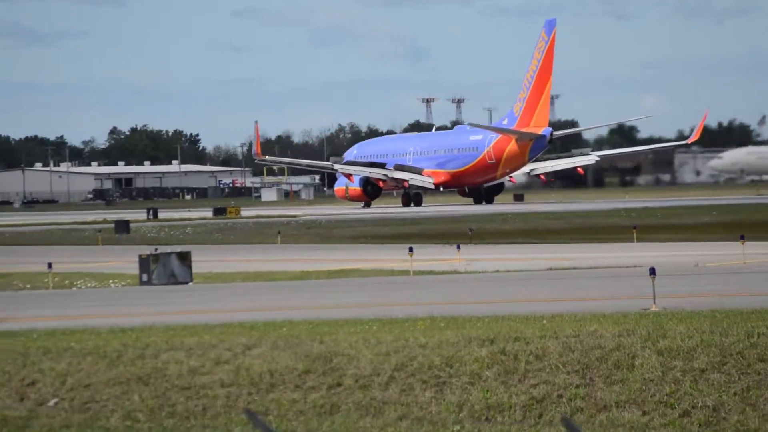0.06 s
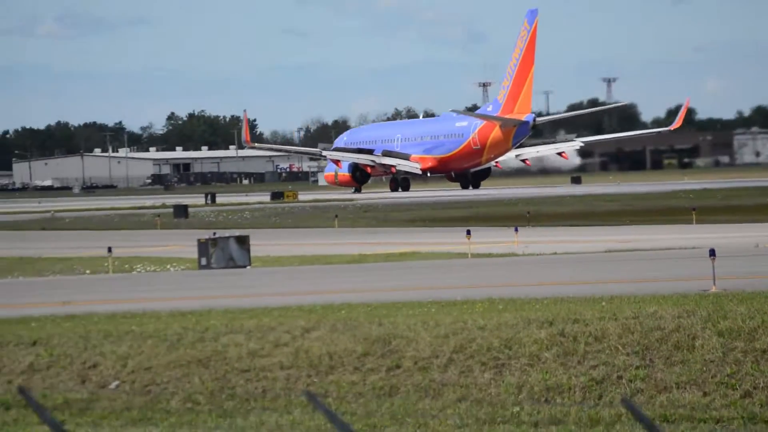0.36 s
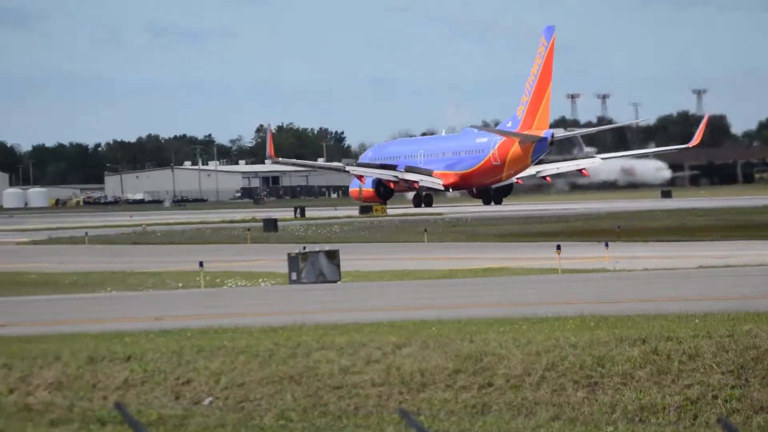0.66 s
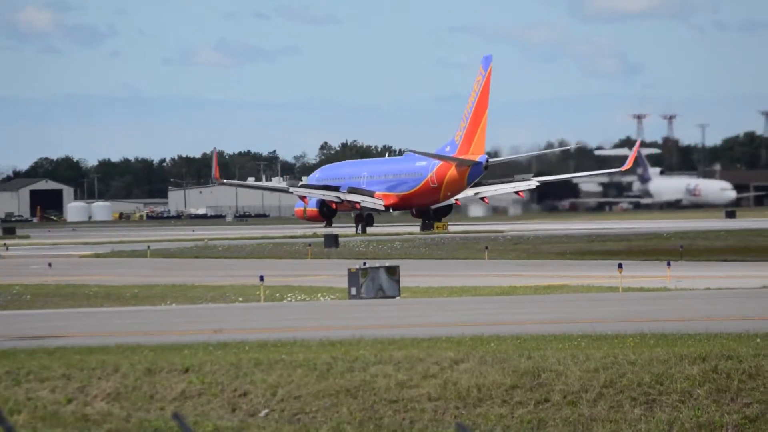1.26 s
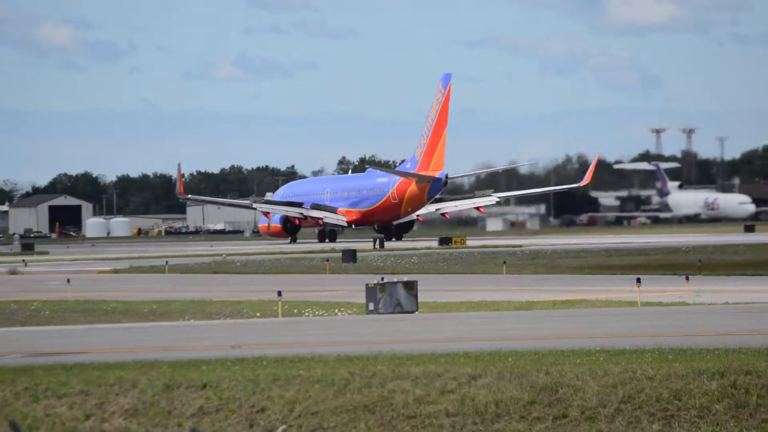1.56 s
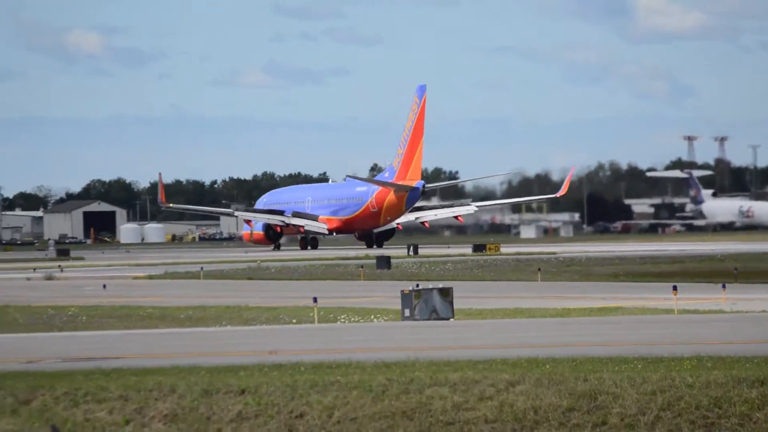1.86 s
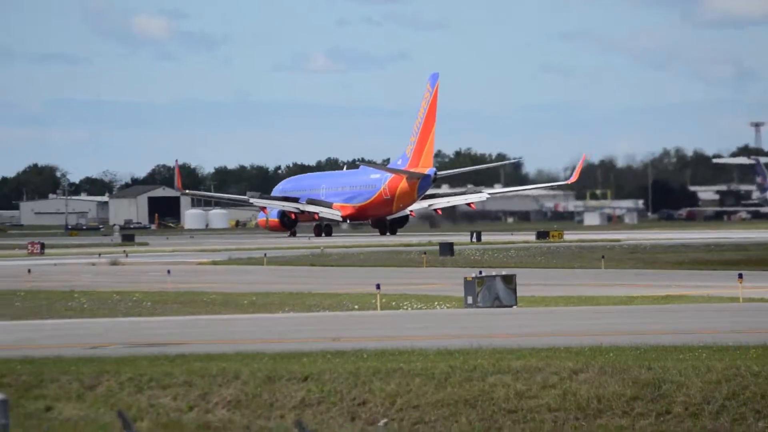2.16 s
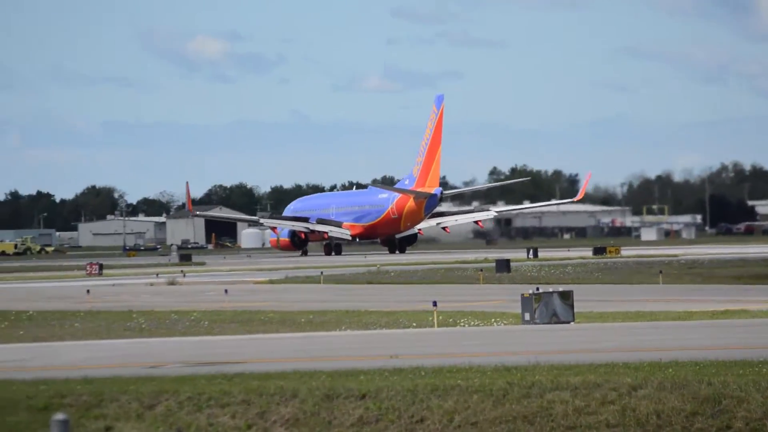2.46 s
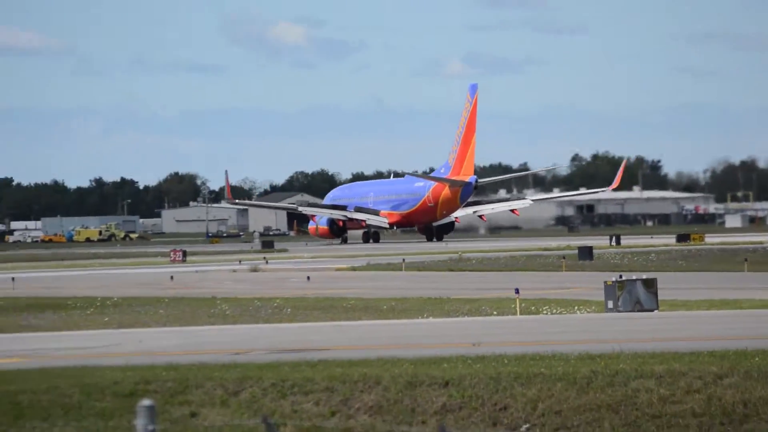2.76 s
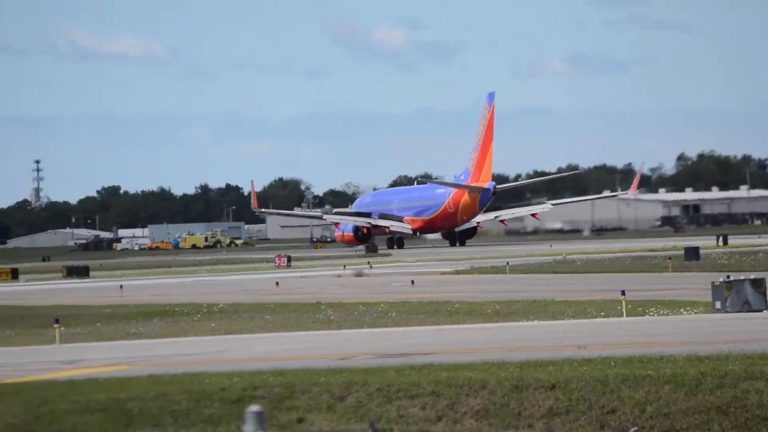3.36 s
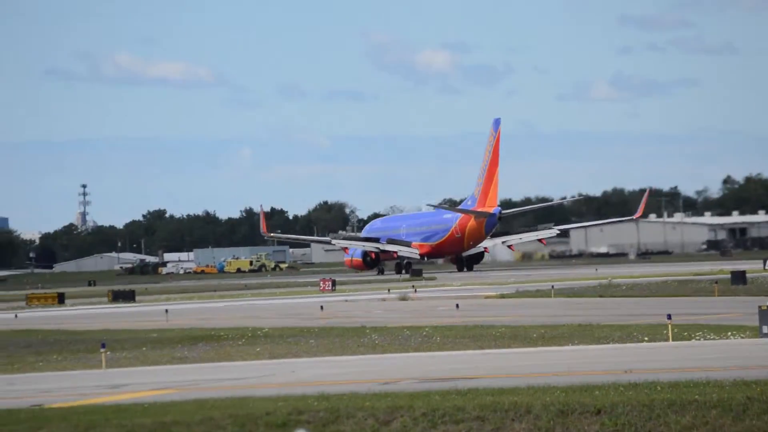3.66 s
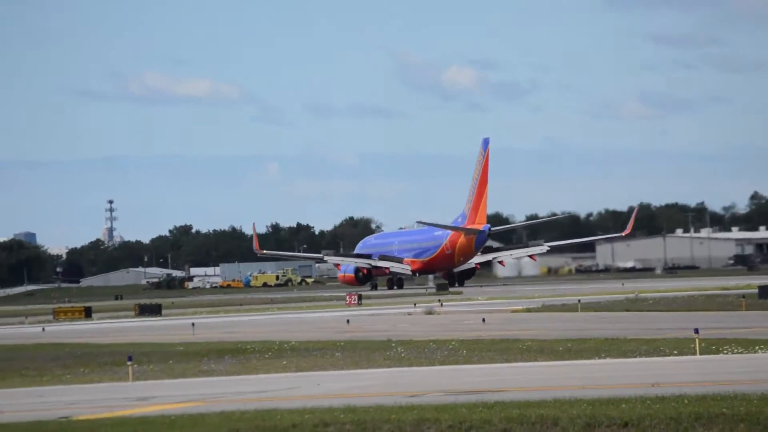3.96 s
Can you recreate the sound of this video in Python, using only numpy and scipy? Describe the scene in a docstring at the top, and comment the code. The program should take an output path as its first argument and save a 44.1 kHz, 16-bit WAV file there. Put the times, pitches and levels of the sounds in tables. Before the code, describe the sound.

A distant jet airliner roars steadily as it rolls away along a runway.

```python
"""Airfield, far from the runway: a jet airliner rolls away.
Exhaust roar, plume rumble and a fading turbine whine arrive twice, direct and off the ground.
The lag shrinks as the jet recedes, so the hollow comb colour slides up; moving air adds flutter.
At the microphone: light breeze, faint hiss, two tiny ticks (the first with a weak afterclick)."""
import sys
import numpy as np
from scipy import signal
from scipy.fft import rfft, irfft
from scipy.io import wavfile

SR = 44100
rng = np.random.default_rng(int(sys.argv[2]) if len(sys.argv) > 2 else 0)


def master_out(mix):
    """Clip the mix to full scale and print it as 16-bit PCM to the path in sys.argv[1]."""
    frames = np.transpose(np.atleast_2d(mix))
    ceiling = np.clip(frames, -1, 1)
    pcm = np.round(ceiling * 32767).astype(np.int16)
    wavfile.write(sys.argv[1], SR, pcm)


N = 176400

# Source spectra: f/Hz, relative density/dB
ROAR_SPECTRUM = [(200, -42.5), (500, -18.5), (800, -6.5), (1050, -2), (1330, .5), (1650, -3), (1950, -4.5),
                 (2400, -13), (3100, -20), (4000, -26.5), (5000, -37.5), (6000, -48.5), (7000, -63.5),
                 (10000, -89)]  # exhaust roar
BODY_SPECTRUM = [(100, -26.5), (260, -7), (390, -8), (560, 1.5), (720, -0.5), (900, -11.5), (1400, -26),
                 (6000, -89.5)]  # its lower, throaty part
RUMBLE_SPECTRUM = [(15, -40.5), (35, -21.5), (60, -5.5), (85, 2), (125, 2), (165, 2), (220, -4.5),
                   (380, -13), (900, -59), (4000, -100)]  # jet plume
BREEZE_SPECTRUM = [(8, -19.5), (25, -8), (42, 4.5), (80, -5.5), (200, -40.5), (800, -89.5)]  # wind on the microphone
HISS_SPECTRUM = [(1000, 0.5), (6500, 0), (9700, 1.5), (12000, -7), (15500, -9.5)]
# Jet envelopes, ahead of the airfield path: t/s, level/dB
ROAR_ENVELOPE = [(0, -18), (.75, -17), (1.1, -18.5), (1.5, -17), (1.85, -18), (2.19, -18.5), (2.23, -20.3),
                 (2.4, -19), (2.72, -18.2), (2.88, -19.5), (3.0, -17), (3.1, -18.8), (3.45, -18),
                 (4, -18.5)]
BODY_ENVELOPE = [(0, -21.5), (.4, -24), (.9, -24.5), (1.3, -25.5), (1.8, -26), (2.05, -22.5), (2.8, -24.5),
                 (2.98, -21.5), (3.2, -25), (4, -24.5)]
RUMBLE_ENVELOPE = [(0, -25), (.7, -25.5), (1.08, -25.5), (1.25, -24), (1.55, -27), (2.099, -27.5),
                   (2.6, -29), (4, -28)]
RING_ENVELOPE = [(0, -37.5), (1.68, -33), (1.85, -21), (1.93, -25.5), (2.15, -23), (2.25, -33),
                 (2.7, -26.5), (4, -34)]  # narrow band ringing in the roar
# Ground reflection behind the direct sound: t/s, lag/ms
BOUNCE_LAG = [(0, 1.82), (.6, 1.727), (1.4, 1.676), (2.1, 1.62), (2.7, 1.62), (4, 1.617)]
# Ground reflection at mid-scene, ahead of a 0 dB cap: f/Hz, gain/dB
BOUNCE_GAIN = [(100, 11), (300, -4), (900, -5), (1500, -11), (2200, -13.5), (2700, -14.5), (3200, -18),
               (4000, -25.5), (6000, -35)]
# Hiss envelope: t/s, level/dB
HISS_ENVELOPE = [(0, -70.5), (2, -69.5), (3, -65), (4, -60.5)]
# Ticks: t/s, peak level/dB
TICK_EVENTS = [(2.258, -21), (2.269, -39), (2.673, -26)]
# Tick resonances: f/Hz, relative level/dB, T60/s
TICK_RESONANCES = [(6200, 8, 0.0017), (7700, 4, 0.0016), (9700, -8, .003), (11400, -10, .003),
                   (13300, -11, .003)]

RING_HZ, RING_WIDTH_HZ = 1291, 150
WHINE_HZ, WHINE_WIDTH_HZ, WHINE_DB = 2933, 120, -43.5
WHINE_HOLD_S, WHINE_FADE_DB_PER_S = 1.0, 10.5
BOUNCE_FADE_DB_PER_S_KHZ = 0.43  # treble drops as the path flattens
AIR_DB_PER_S, AIR_REF_HZ = 0.72, 5000
FLUTTER_DB, FLUTTER_S, FLUTTER_WIDTH_HZ = 0.59, .1, 220
BREEZE_DB, BREEZE_RISE_DB_PER_S, GUST_DB, GUST_S = -46.5, 2.5, 1.5, .08
TICK_BAND_HZ, TICK_TAIL_DB, TICK_TAIL_T60_S = (5400, 14000), -28, 0.024
OVERLOAD_KNEE, OVERLOAD_LOSS, CUTOFF_HZ = 0.41, 0.15, 15800


def exhaust():
    """Turbulent jet: noise in three registers plus a ringing mid band."""
    roar = noise(ROAR_SPECTRUM) * envelope(ROAR_ENVELOPE)
    body = noise(BODY_SPECTRUM) * envelope(BODY_ENVELOPE)
    rumble = noise(RUMBLE_SPECTRUM) * envelope(RUMBLE_ENVELOPE)
    ring = band(RING_HZ, RING_WIDTH_HZ) * envelope(RING_ENVELOPE)
    return roar + body + rumble + ring


def turbine_whine():
    """Smeared tone; holds, then fades as the engines turn tail-on."""
    fading_s = np.maximum(np.arange(N) / SR - WHINE_HOLD_S, 0)
    return band(WHINE_HZ, WHINE_WIDTH_HZ) * amp(WHINE_DB - WHINE_FADE_DB_PER_S * fading_s)


def airfield_path(jet, size=1024, hop=256):
    """Ground-reflection comb, growing air absorption, turbulent flutter."""
    hz, t, spectra = signal.stft(jet, SR, nperseg=size, noverlap=size - hop)
    hz, from_mid_s = hz[:, None], t - t.mean()
    lag_s = np.interp(t, *np.transpose(BOUNCE_LAG)) / 1000
    bounce_db = db_at(BOUNCE_GAIN, hz) - BOUNCE_FADE_DB_PER_S_KHZ * (hz / 1000) * from_mid_s
    comb = 1 + amp(np.minimum(bounce_db, 0)) * np.exp(-2j * np.pi * hz * lag_s)
    air_db = -AIR_DB_PER_S * from_mid_s * np.minimum((hz / AIR_REF_HZ) ** 3, 2)
    # Patches of the spectrum swell and fade.
    drift = smooth(rng.standard_normal(spectra.shape), FLUTTER_S * SR / hop)
    patches = unit(smooth(drift, FLUTTER_WIDTH_HZ * size / SR, axis=0))
    heard = spectra * comb * amp(air_db + FLUTTER_DB * patches)
    return signal.istft(heard, SR, nperseg=size, noverlap=size - hop)[1][:N]


def breeze():
    """Soft gusts buffet the microphone, slowly growing."""
    gusts = unit(smooth(rng.standard_normal(N), GUST_S * SR))
    buffeting = unit(noise(BREEZE_SPECTRUM) * amp(GUST_DB * gusts))
    return buffeting * amp(BREEZE_DB + BREEZE_RISE_DB_PER_S * np.arange(N) / SR)


def ticks(size=1024):
    """Thin, hard clicks: fast-decaying modes, brief scattered tail."""
    out, t = np.zeros(N), np.arange(size) / SR
    modes = sum(amp(db - 60 * t / t60_s) * np.sin(2 * np.pi * hz * t)
                for hz, db, t60_s in TICK_RESONANCES)
    ring = signal.sosfilt(signal.butter(4, TICK_BAND_HZ, "band", fs=SR, output="sos"), modes)
    for start_s, peak_db in TICK_EVENTS:
        scatter = rng.standard_normal(size) * amp(TICK_TAIL_DB - 60 * t / TICK_TAIL_T60_S)
        tick = ring + np.convolve(ring, scatter)[:size]
        out[round(start_s * SR):][:size] += amp(peak_db) * tick / abs(tick).max()
    return out


def hiss():
    """Faint broadband noise, rising late."""
    return noise(HISS_SPECTRUM) * envelope(HISS_ENVELOPE)


def noise(spectrum):
    """Shaped noise, rms 1."""
    gain = amp(db_at(spectrum, np.fft.rfftfreq(N, 1 / SR)))
    return unit(irfft(rfft(rng.standard_normal(N)) * gain, N))


def band(centre_hz, width_hz):
    """Gaussian noise band, rms 1."""
    hz = np.fft.rfftfreq(N, 1 / SR)
    gain = np.exp(-2 * ((hz - centre_hz) / width_hz) ** 2)
    return unit(irfft(rfft(rng.standard_normal(N)) * gain, N))


def envelope(points):
    """Level table to gain per sample."""
    return amp(np.interp(np.arange(N) / SR, *np.transpose(points)))


def db_at(spectrum, hz):
    """Table lookup, log frequency."""
    table_hz, db = np.transpose(spectrum)
    return np.interp(np.log(hz + 1), np.log(table_hz + 1), db)


def smooth(x, span, axis=-1):
    """Gaussian blur over about span steps."""
    size = x.shape[axis]
    gain = np.exp(-(2 * span * np.fft.rfftfreq(size)) ** 2)
    blurred = irfft(rfft(np.swapaxes(x, axis, -1)) * gain, size)
    return np.swapaxes(blurred, axis, -1)


def amp(db):
    """dB to gain."""
    return 10 ** (np.asarray(db) / 20)


def unit(x):
    """Scale to rms 1."""
    return x / np.sqrt(np.mean(x ** 2) + 1e-20)


def scene():
    """Distant jet plus near sounds, mono."""
    jet = airfield_path(exhaust() + turbine_whine())
    return (jet + breeze() + hiss() + ticks())[None]


def record(dry):
    """Slight overload above the knee, then low-pass."""
    excess = np.maximum(abs(dry) - OVERLOAD_KNEE, 0)
    flattened = dry - np.sign(dry) * excess * OVERLOAD_LOSS
    low_pass = signal.firwin(511, CUTOFF_HZ, window=("kaiser", 9), fs=SR)
    return signal.oaconvolve(flattened, low_pass[None], "same")


dry = scene()
out = record(dry)
master_out(out)
```